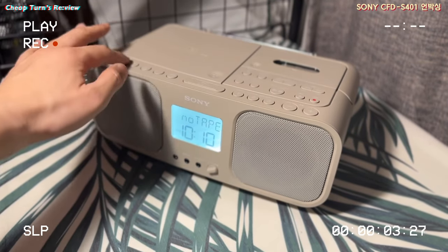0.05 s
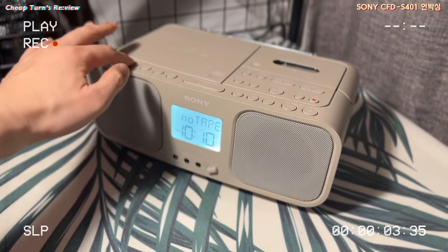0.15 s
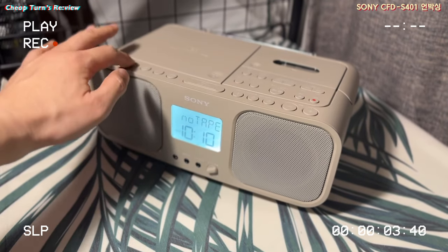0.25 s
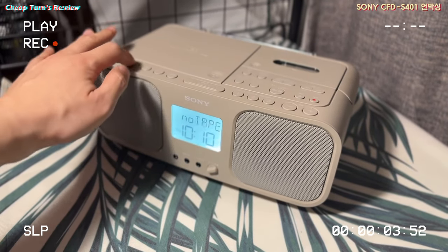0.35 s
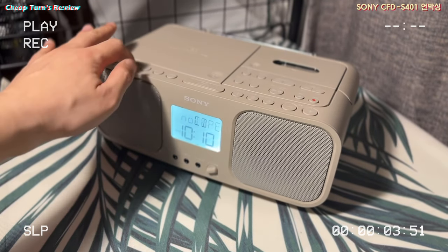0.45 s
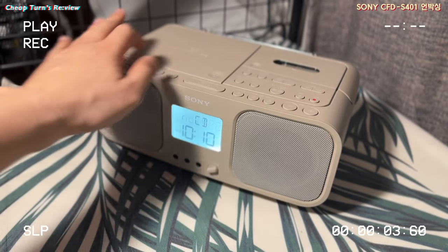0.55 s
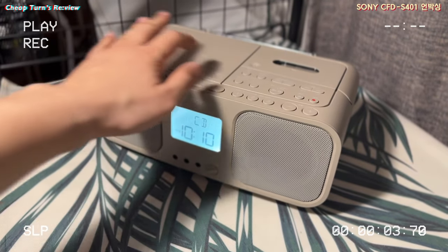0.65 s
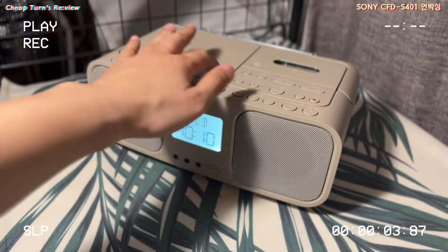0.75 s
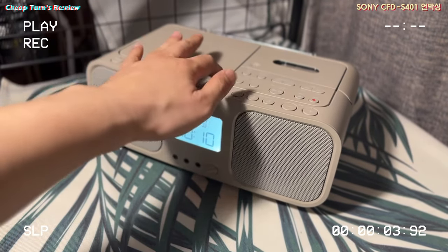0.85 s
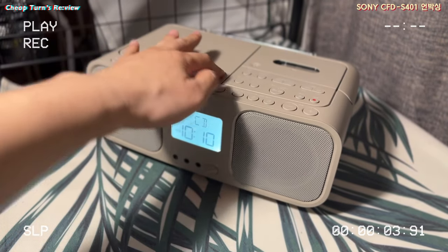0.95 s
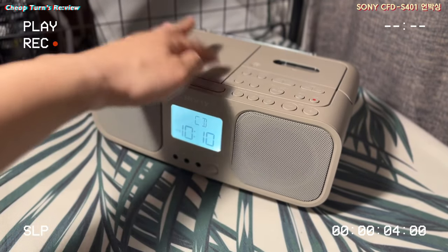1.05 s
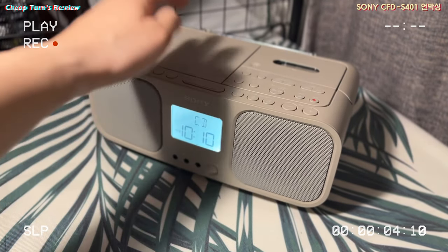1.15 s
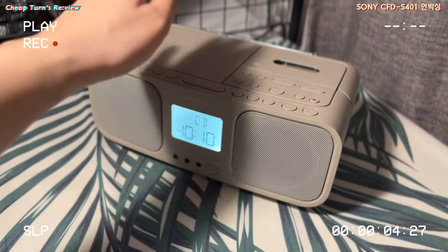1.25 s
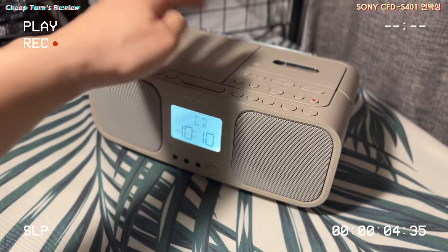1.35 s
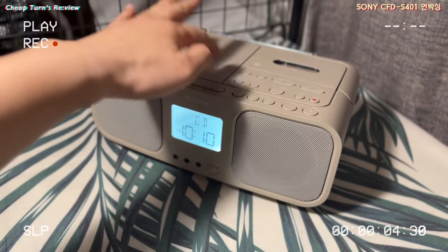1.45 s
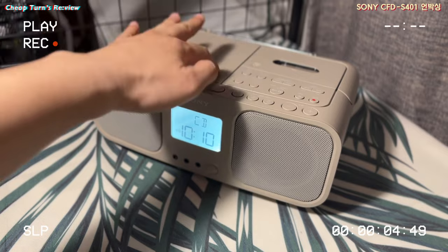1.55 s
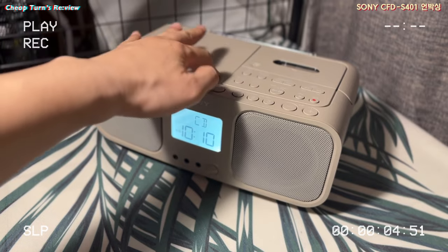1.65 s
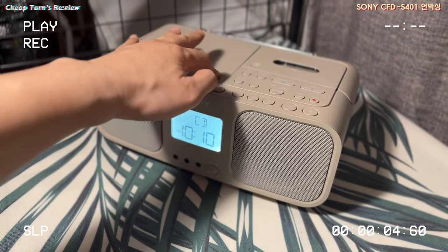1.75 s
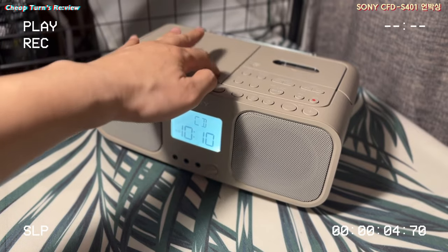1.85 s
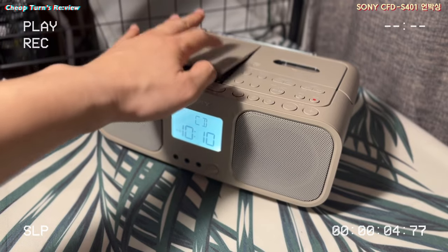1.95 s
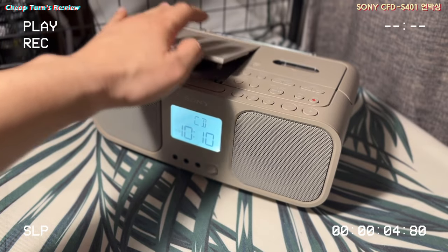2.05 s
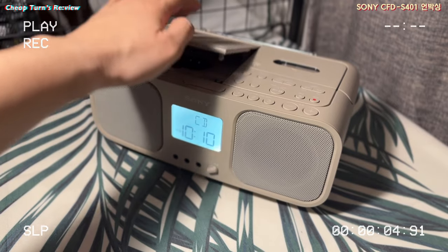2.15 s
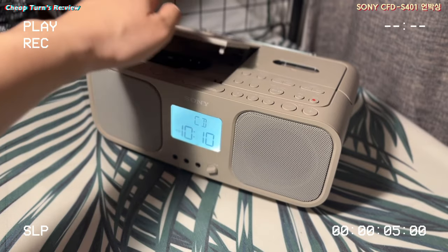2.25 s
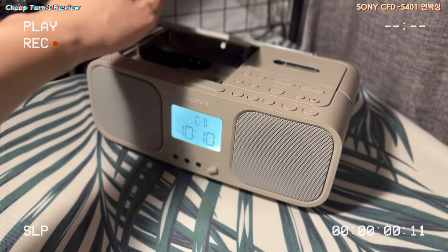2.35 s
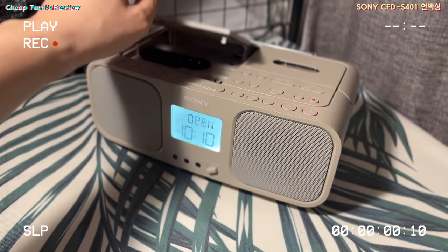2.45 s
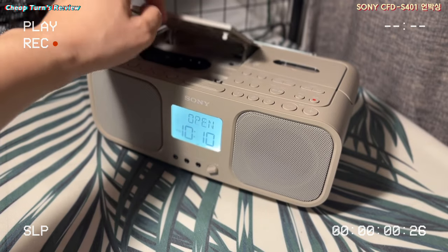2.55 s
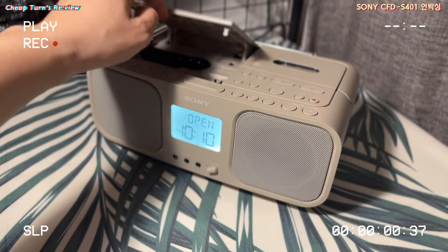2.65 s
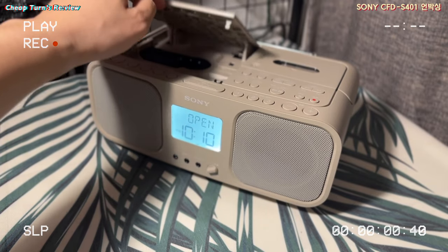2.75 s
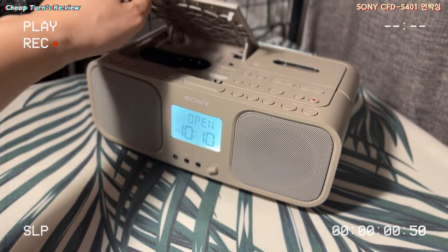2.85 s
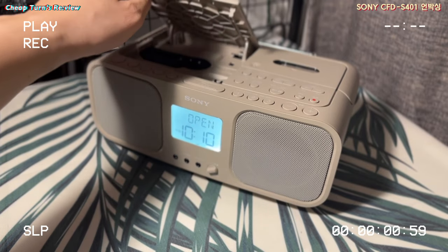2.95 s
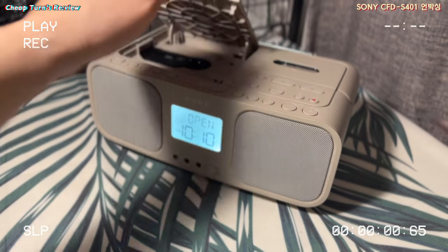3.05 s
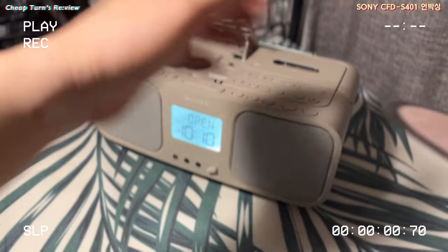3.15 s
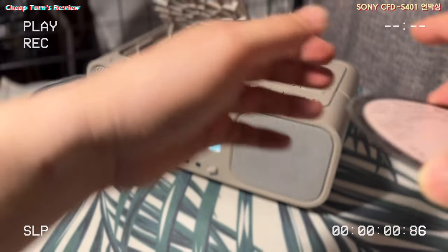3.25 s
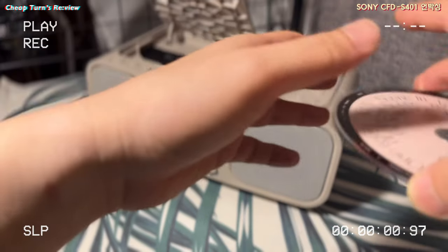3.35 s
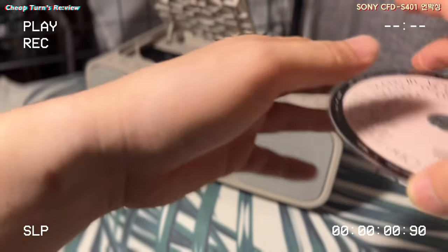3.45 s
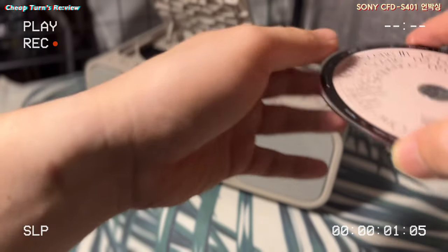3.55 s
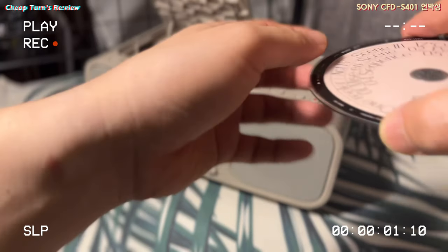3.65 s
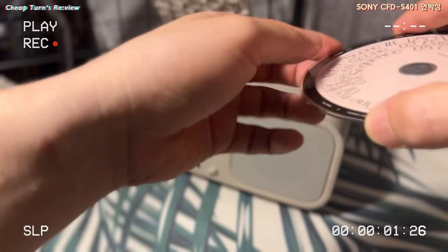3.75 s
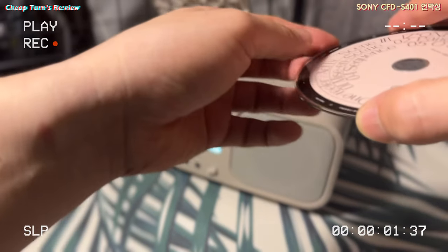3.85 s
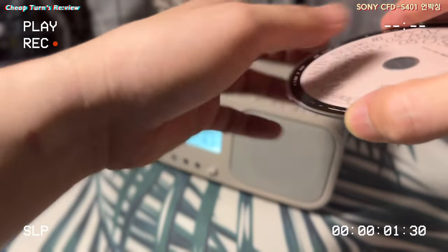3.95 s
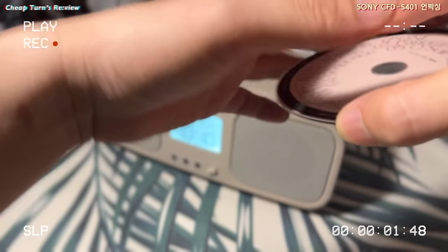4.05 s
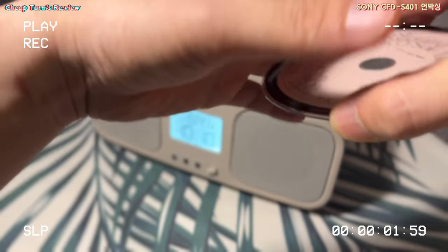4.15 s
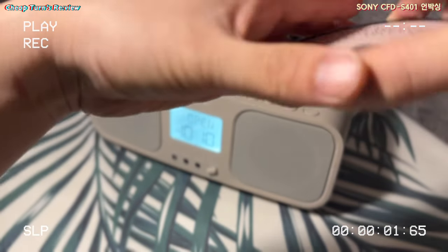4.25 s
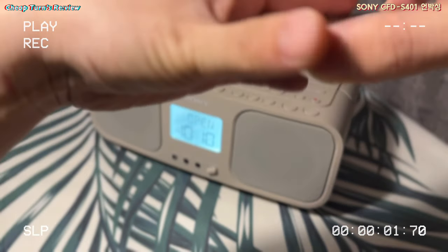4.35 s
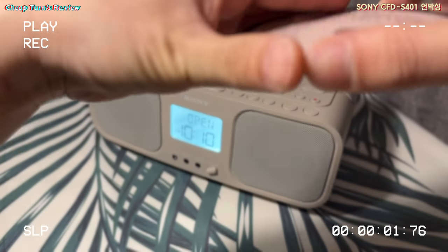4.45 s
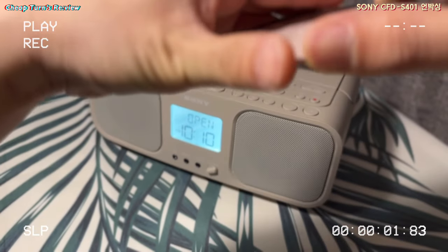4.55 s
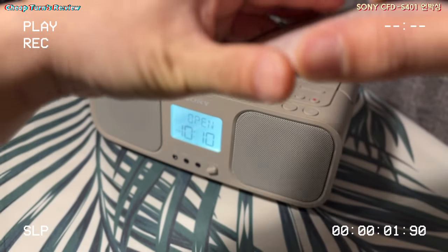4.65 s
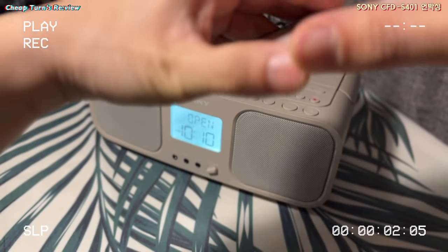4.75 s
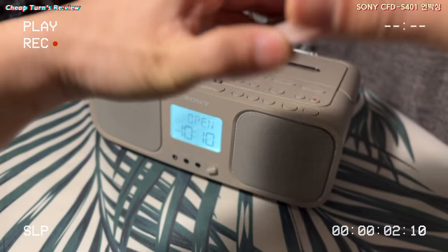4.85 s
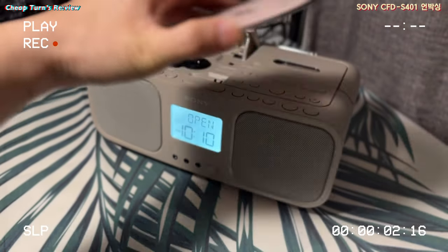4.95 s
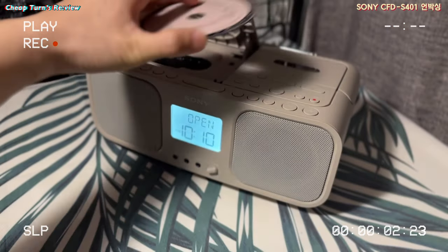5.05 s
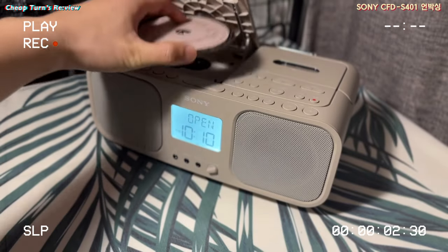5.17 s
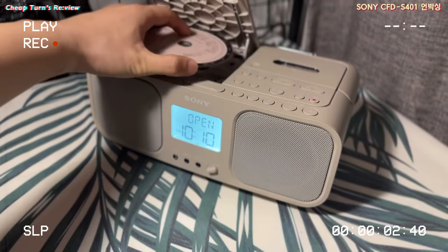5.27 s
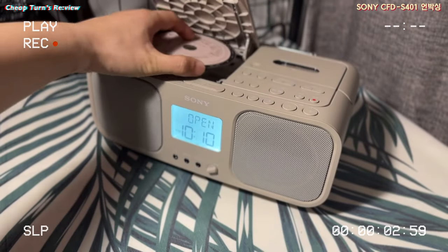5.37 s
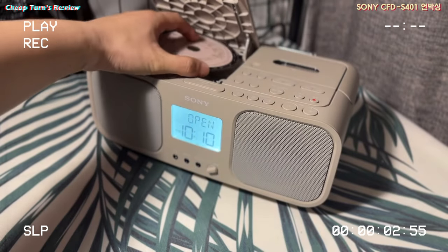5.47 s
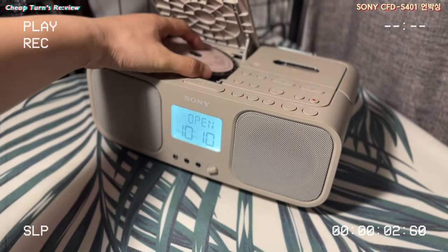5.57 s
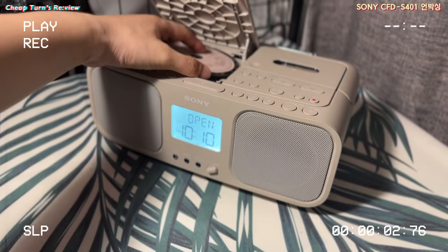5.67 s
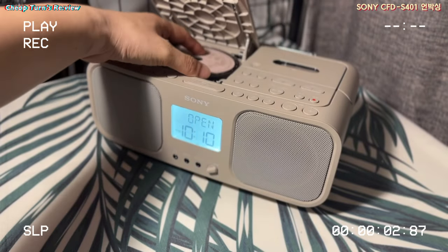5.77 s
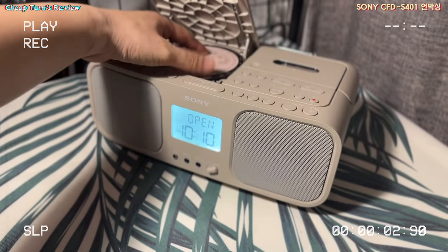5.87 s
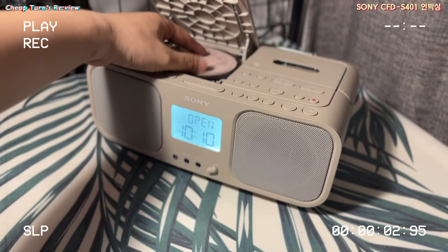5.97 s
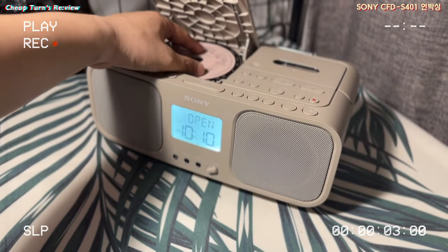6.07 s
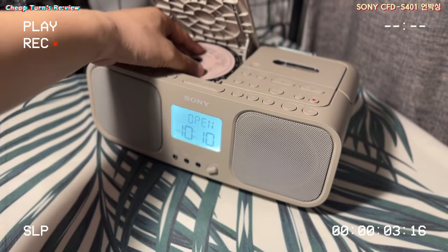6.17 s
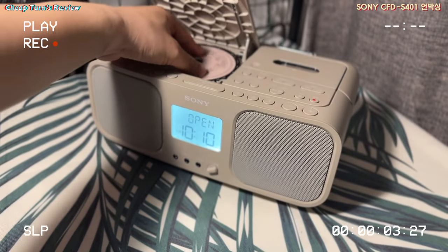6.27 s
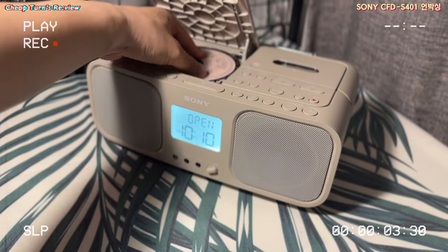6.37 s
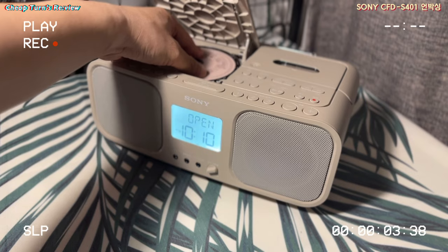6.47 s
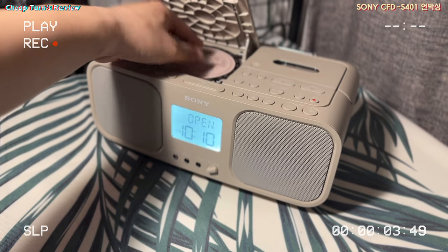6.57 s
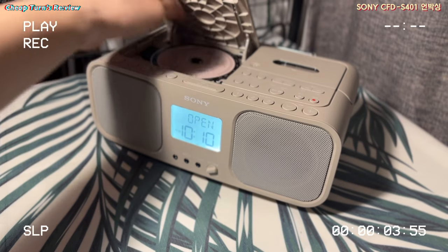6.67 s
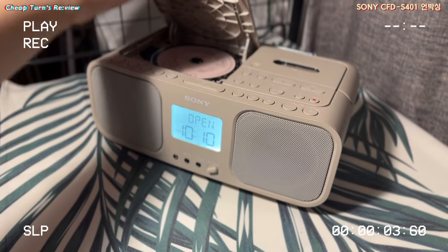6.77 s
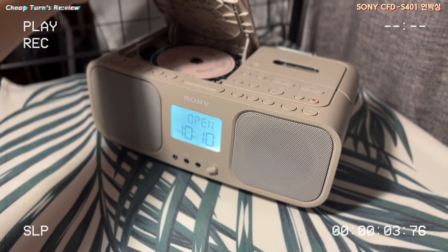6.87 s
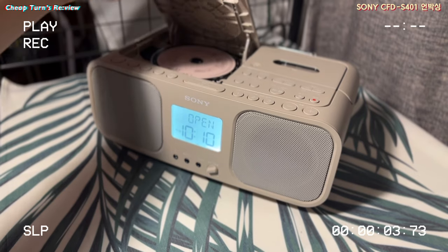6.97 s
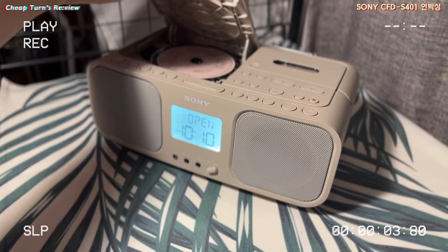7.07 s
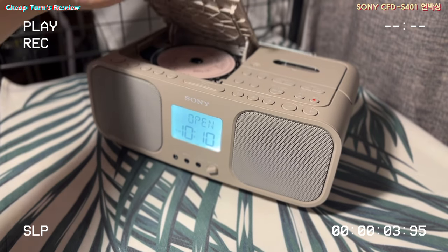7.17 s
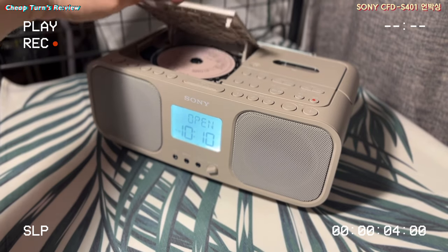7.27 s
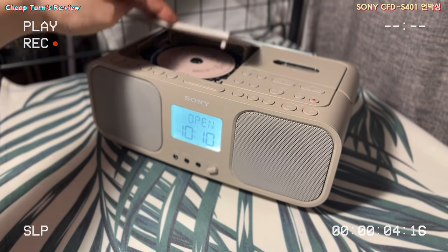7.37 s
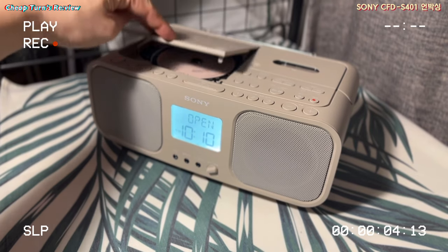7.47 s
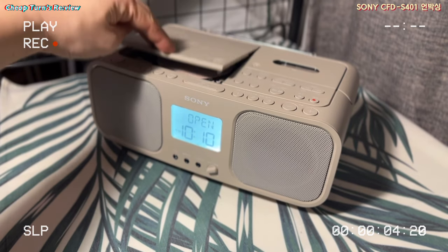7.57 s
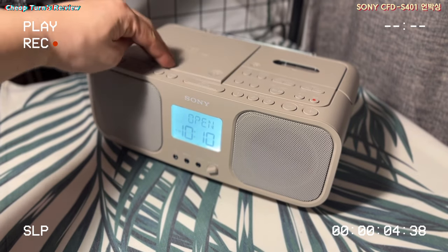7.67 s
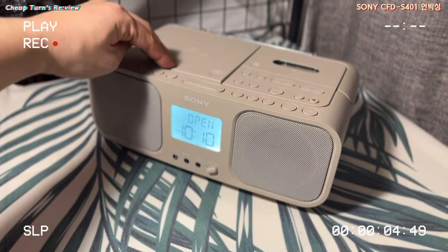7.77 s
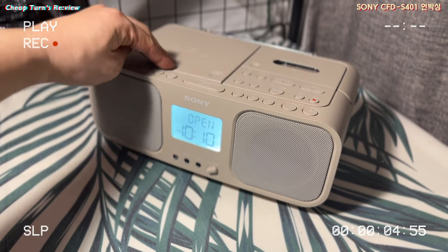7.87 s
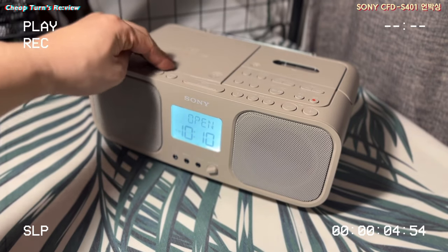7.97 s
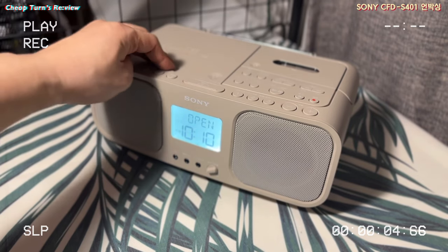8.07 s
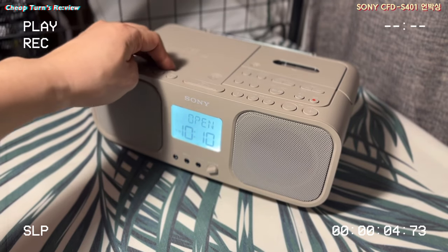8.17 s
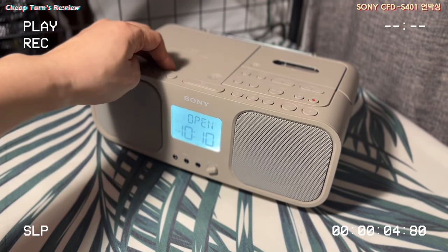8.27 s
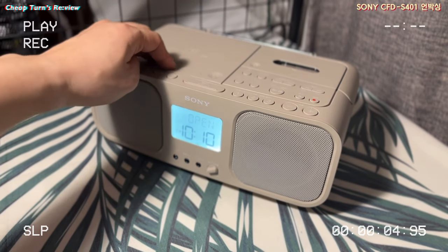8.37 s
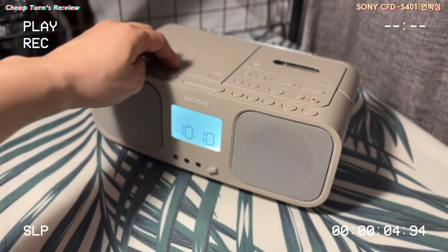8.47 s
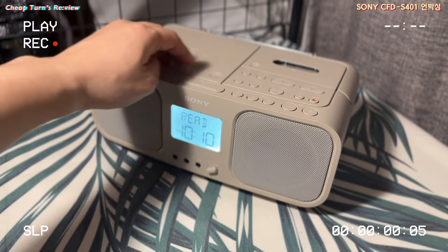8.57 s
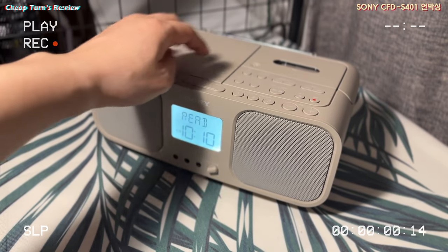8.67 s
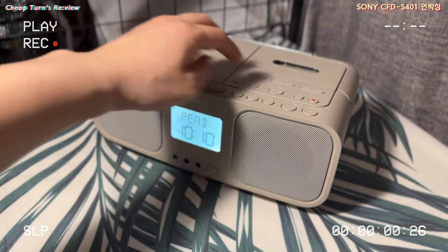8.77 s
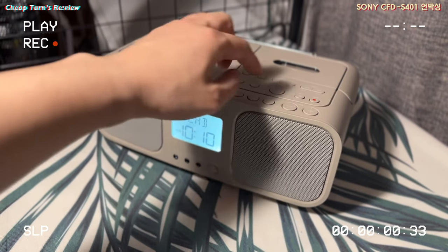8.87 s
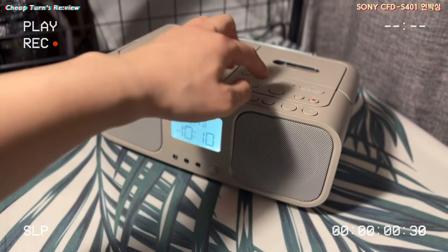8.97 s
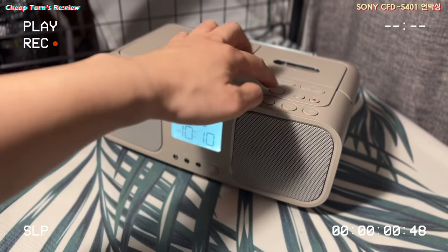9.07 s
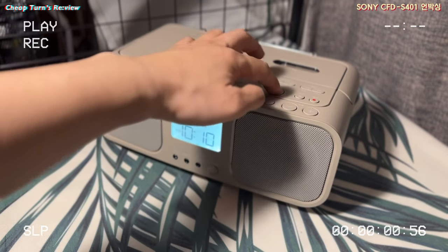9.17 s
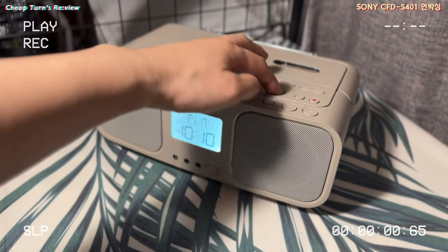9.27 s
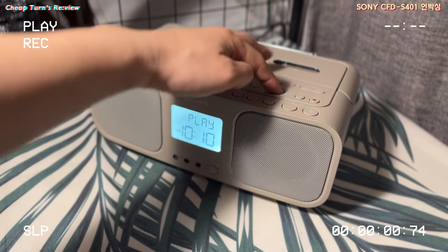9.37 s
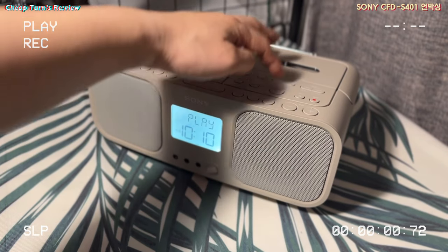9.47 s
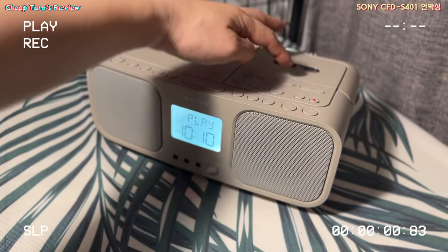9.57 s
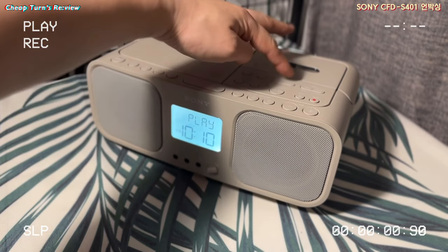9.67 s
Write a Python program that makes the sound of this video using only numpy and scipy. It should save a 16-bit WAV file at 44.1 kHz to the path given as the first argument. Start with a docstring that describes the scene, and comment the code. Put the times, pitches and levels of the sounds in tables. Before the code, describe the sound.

Close plastic clicks, a lid popping open, a disc rattling and snapping into place, lid clicks and a final firm button press over low rumble.

```python
"""A small, soft room, where a disc is loaded into a plastic portable stereo a little left of centre.
Buttons click, the lid unlatches and swings up, the disc scrapes into the tray and snaps onto its hub,
the lid is pressed shut and a last button is pushed. Blows excite decaying modes and noise, rubs are
random stick-slip, and a soft seat adds low thumps. Shaped noise gives an outside rumble and faint hiss,
a wavering sine a far engine drone; decaying noise gives the room's reflections."""
import sys
import numpy as np
from scipy import signal
from scipy.fft import rfft, irfft, next_fast_len
from scipy.io import wavfile

SR = 44100
rng = np.random.default_rng(int(sys.argv[2]) if len(sys.argv) > 2 else 0)


def pcm_store(signal):
    """Save signal as 16-bit PCM."""
    levels = np.round(np.clip(np.atleast_2d(signal), -1, 1) * 32767)
    wavfile.write(sys.argv[1], SR, levels.astype(np.int16).T)


N = 428635

# edges of the thud, knock, clack, click and snap registers: f/Hz
REGISTER_EDGES_HZ = [130, 400, 1100, 2800, 7000, 15000]
# modes of the disc, before each blow detunes and reweights them: f/Hz, relative level/dB, t60/s
DISC_RESONANCES = [(364.6, 9.5, 0.098), (445, 3.5, .08), (515, -2.5, .07), (610, -0.5, .065),
                   (1225, 2.5, 0.045), (1350, -5.5, 0.041), (1600, 0, .06), (1760, -2, .06), (2035, -8, .1),
                   (2530, -7.5, .06), (2999, -6, .05)]
# the hub's clips spring through the disc, then the disc lands on the platter; levels before trim:
# t/s, thud/dB, knock/dB, clack/dB, click/dB, snap/dB, base ring t60/s, contact rise/s
HUB_CONTACTS = [(6.3412, -38.5, -26.5, -33, -31.5, -31, 0.064, 0.00046),
                (6.3432, -29.5, -20.5, -35.5, -39, -47, 0.055, 0.00057)]


def from_db(db):
    """Amplitude gain from level: 20 dB is a factor of ten."""
    return 10 ** (np.asarray(db) / 20)


def rms_one(x):
    """Normalise the root-mean-square amplitude to one."""
    return x / np.sqrt(np.mean(x ** 2) + 1e-20)


def at_hz(points, hz):
    """Interpolate a spectrum on a logarithmic frequency axis."""
    f, value = np.transpose(points)
    return np.interp(np.log(np.maximum(hz, 1)), np.log(f), value)


def band(x, low_hz, high_hz, order=3):
    """Causal band-pass with maximally flat (Butterworth) response."""
    edges = [low_hz, min(high_hz, .45 * SR)]
    return signal.sosfilt(signal.butter(order, edges, "band", fs=SR, output="sos"), x)


def add(out, s, sound):
    """Linear superposition of a sound starting at time s."""
    i = round(s * SR)
    out[:, i:i + sound.shape[1]] += sound[:, :N - i]


def diffuse(size, spectrum=None):
    """Diffuse-field noise at unit rms: mid and side noises mix to a frequency-dependent correlation."""
    # left-right correlation of diffuse sound: f/Hz, correlation
    likeness = [(60, 1), (130, 0.84), (290, .78), (640, 0.18), (1400, -0.03), (3100, .2), (7000, 0.028),
                (15000, 1)]
    padded = next_fast_len(size, True)
    hz = np.fft.rfftfreq(padded, 1 / SR)
    mid, side = rfft(rng.standard_normal((2, padded)))
    alike = np.clip(at_hz(likeness, hz), -1, 1)
    pair = np.sqrt(1 + alike) * mid + np.sqrt(1 - alike) * side * [[1], [-1]]
    colour = 1 if spectrum is None else from_db(at_hz(spectrum, hz))
    return rms_one(irfft(pair * colour, padded)[:, :size])


def direct(x):
    """Time difference of arrival: a source left of centre reaches the right side later."""
    lag_s = 5.8e-5
    hz = np.fft.rfftfreq(len(x), 1 / SR)
    right = irfft(rfft(x) * np.exp(-2j * np.pi * hz * lag_s), len(x))
    return np.array([x, right])


def ringing(modes, t, scatter_db, spread, detune):
    """Modal synthesis: decaying sines, detuned and weighted anew each time, with a phase for each side."""
    hz, level_db, t60 = np.transpose(modes)[:, :, None]
    strength, skew, load = rng.standard_normal((3, len(modes), 1))
    fade = from_db(level_db + scatter_db * strength - 60 * t / t60)
    turn = spread * np.sign(skew) * np.minimum(hz / 700, 1)
    phase = 2 * np.pi * hz * (1 + detune * load) * t
    return np.array([(fade * np.sin(phase + way * turn)).sum(0) for way in (-1, 1)])


def local_modes(count, low_hz, high_hz, level_db, t60):
    """Local resonance: each spot on the shell also wakes a few small panel modes of its own."""
    place, size = rng.random((2, count))
    hz = low_hz * (high_hz / low_hz) ** place
    return np.transpose([hz, level_db + 8 * (size - .5), np.full(count, t60)])


def coloured(x, levels_db, trim_db, left_db):
    """Minimum-phase equalisation: the first 20 ms of a blow is steered to its level in each register."""
    size, edges, attack = x.shape[-1], np.array(REGISTER_EDGES_HZ), SR // 50
    hz, centres = np.fft.rfftfreq(size, 1 / SR), np.sqrt(edges[1:] * edges[:-1])
    power = (np.abs(rfft(x[:, :attack], size)) ** 2).mean(0) * 2 / (size * attack)
    starts, gain_db = np.searchsorted(hz, edges), np.zeros(len(centres))
    target_db = np.add(levels_db, trim_db)
    # repeated because the smooth curve lets neighbouring registers affect each other
    for _ in range(3):
        curve = from_db(at_hz(np.transpose([centres, gain_db]), hz))
        register_power = np.add.reduceat(power * curve ** 2, starts)[:-1]
        gain_db = gain_db + target_db - 10 * np.log10(register_power)
    sides_db = [at_hz(np.transpose([centres, gain_db + way * np.array(left_db)]), hz)
                for way in (.5, -.5)]
    # folding the cepstrum makes the filter minimum-phase, so nothing sounds early
    cepstrum = irfft(np.log(from_db(sides_db)), size)
    cepstrum[:, 1:size // 2] *= 2
    cepstrum[:, size // 2 + 1:] = 0
    return irfft(rfft(x) * np.exp(rfft(cepstrum)), size)


def contacts(rows, colour, ring_s, shortening):
    """Spectral slope of an impact: strength and touch set register levels; stronger blows ring shorter.

    Returns columns t/s, five register levels/dB, base ring t60/s, contact rise/s."""
    reference_db = -50  # level at which a blow rings for ring_s
    # the middle of the shell's range, and how far from it the whole hollowness is lost
    shell_centre_hz, shell_width_octaves = 1600, 2.75
    edges = np.array(REGISTER_EDGES_HZ)
    octaves = np.log2(np.sqrt(edges[1:] * edges[:-1]) / shell_centre_hz)
    s, level_db, brightness, hollow_db, rise = np.transpose(rows)[:, :, None]
    hollow_loss_db = hollow_db * (octaves / shell_width_octaves) ** 2
    levels_db = level_db + np.array(colour) + brightness * octaves - hollow_loss_db
    ring = ring_s * np.exp(-shortening * (level_db - reference_db))
    return np.hstack([s, levels_db, ring, rise])


def blows(table, modes, crack_db, crack_t60, modes_db, bass_ring, treble_ring,
          scatter_db, spread, detune, trim_db, left_db):
    """Impact excitation: a short crack, discrete modes and a wash of dense modes, coloured by contact."""
    out, t = np.zeros((2, N)), np.arange(next_fast_len(SR // 7, True)) / SR
    low, high = [signal.butter(2, 2500, kind, fs=SR) for kind in ("low", "high")]
    small_shell = signal.butter(2, 110, "high", fs=SR)
    dying = np.minimum((t[-1] - t) / .03, 1)
    for s, *levels_db, ring_t60, rise_s in table:
        crack = direct(rng.standard_normal(len(t)) * from_db(crack_db - 60 * t / crack_t60))
        tones = from_db(modes_db) * ringing(modes, t, scatter_db, spread, detune)
        panels = local_modes(count=12, low_hz=1437.6, high_hz=6690, level_db=-17.5, t60=0.44 * ring_t60)
        tones = tones + ringing(panels, t, scatter_db, spread, detune)
        # large, slow motions of the shell outlast the small fast ones
        slow_fade = from_db(-60 * t / (ring_t60 * bass_ring))
        slow = signal.lfilter(*low, diffuse(len(t))) * slow_fade
        fast_fade = from_db(-60 * t / (ring_t60 * treble_ring))
        fast = signal.lfilter(*high, rng.standard_normal((2, len(t)))) * fast_fade
        # a fingertip builds its force slowly and swallows the crack; plastic on plastic does not
        struck = (crack + tones + slow + fast) * (1 - np.exp(-t / rise_s)) * dying
        shell_sound = signal.lfilter(*small_shell, struck)
        add(out, s, coloured(shell_sound, levels_db, trim_db, left_db) * dying)
    return out


def background():
    """Stationary noise and narrow-band modulation: rumble booms in bass resonances, a drone wavers."""
    # slow swell of the outside rumble: t/s, relative level/dB
    rumble_swell = [(0.0, -64), (0.38, -65.5), (0.65, -63.5), (4.6, -63), (5.87, -56.5), (7.06, -60.5),
                    (8.58, -57.5), (8.93, -61), (9.72, -56)]
    # spectra of the rumble and the faint hiss: f/Hz, relative density/dB per Hz
    rumble_spectrum = [(20, -36.5), (35, -18.5), (48, -6.5), (58, 7), (68, -4), (82, -8), (96, -0.5),
                       (115, -15.5), (160, -10.5), (210, -18), (300, -22.5), (400, -30.5), (550, -29.5),
                       (1000, -61)]
    hiss_spectrum = [(200, -0.5), (600, 12), (1200, 7), (2500, 1), (5000, -2.5), (7000, -7.5), (9000, -14),
                     (12500, -9.5), (15000, -22.5)]
    # a far engine drone: t/s, f/Hz, relative level/dB
    drone_track = [(0, 150.6, -64), (2.2, 148.4, -88), (3.2, 119.1, -63.5), (4.251, 144.5, -60.5),
                   (5.7, 161.4, -64), (7.6, 146, -61), (9.72, 162.4, -59)]
    t = np.arange(N) / SR
    rumble_level_db = 4 + np.interp(t, *np.transpose(rumble_swell))
    rumble = diffuse(N, rumble_spectrum) * from_db(rumble_level_db)
    s, hz, level_db = np.transpose(drone_track)
    smooth = signal.butter(2, 8.7, fs=SR, output="sos")  # waver bandwidth in Hz
    # one second of lead-in lets the smoothing filter settle
    waver = rms_one(signal.sosfilt(smooth, rng.standard_normal((2, N + SR)))[:, SR:])
    phase = 2 * np.pi * np.cumsum(np.interp(t, s, hz)) / SR
    carrier = waver[0] * np.sin(phase) + waver[1] * np.cos(phase)
    drone = carrier * from_db(-1.0 + np.interp(t, s, level_db))
    return rumble + drone + from_db(-82.0) * diffuse(N, hiss_spectrum)


def case_contacts():
    """Spectral slope of the case's impacts: each part has its own colour and ring length."""
    # light ticks of a thin top panel; then buttons pressed and let go; the lid's latch springing
    # and catching; the lid knocking on its hinge and under the hand:
    # t/s, base level/dB, brightness/dB per octave, hollowness/dB, contact rise/s
    panel_ticks = [(0.027, -74.5, 0, 12, 0.0028), (0.099, -68.5, -1, 9, 0.012),
                   (0.514, -67.5, -2, 6, 0.0017), (2.678, -47, 0.3, 9, 0.0014), (2.89, -73, -2, 11, 0.023),
                   (8.178, -42.5, -0.37, 6, 0.0012), (8.245, -71, -2, 3.5, .005), (9.03, -78, -1, 5, .01)]
    buttons = [(0.268, -53, -4, 30, 0.00086), (0.48, -61.5, -2.1, 3, 0.0012), (0.853, -54.5, -5, 9, .004),
               (0.872, -61.5, -4, 0, 0.0014), (1.005, -78, -4.5, -6, 0.0032), (1.03, -61.5, -7, 5, 0.0014),
               (1.561, -55.5, -6, 10, 0.0034), (9.121, -59, -3.7, 13.5, 0.0013),
               (9.177, -40, -1.5, 19, 0.0008), (9.398, -40, -4, 14, 0.0053),
               (9.412, -50.5, -2.5, 17, 0.0026)]
    latch_clicks = [(1.661, -51, 1.4, -6.7, 0.0016), (1.88, -46.5, 1.13, -0.5, .002),
                    (7.446, -86.5, -0.5, -19, .0003), (7.6404, -53.5, 0.4, 1.5, 0.0017),
                    (8.02, -58, -1, 14, 0.00097), (8.114, -55.5, 2.5, -7, 0.00045),
                    (8.3366, -46.5, -1, -5.5, 0.0014), (8.419, -68.5, -4, -3, 0.0021),
                    (8.496, -77, -5.5, -6.5, 0.001)]
    lid_knocks = [(2.68, -59.5, -5, 7.5, 0.0065), (2.904, -80.5, -3, -1, 0.0039),
                  (6.709, -60, -3, 6.5, 0.00088), (6.745, -45, -3.5, 13, 0.0064),
                  (6.773, -44, -4, 11.5, 0.002), (6.951, -63, -6, 15.5, 0.00075),
                  (7.025, -68.5, -9, 10.5, 0.0023), (7.262, -80.5, -9, 7.5, 0.006),
                  (7.849, -64.5, -6, 10, .0015)]
    # each part's own colour; the thin panel rings mostly in the clack register:
    # thud/dB, knock/dB, clack/dB, click/dB, snap/dB
    panel_colour = (-13, -15.5, -3, -10, -9.5)
    button_colour = (-0.34, -0.38, 0.12, -0.56, -1.8)
    latch_colour = (-0.49, -0.94, -2.7, 1.23, 1.3)
    lid_colour = (0.046, -0.35, -0.45, 0.34, -0.96)
    return np.vstack([contacts(buttons, button_colour, ring_s=0.077, shortening=0.025),
                      contacts(latch_clicks, latch_colour, ring_s=0.094, shortening=.003),
                      contacts(panel_ticks, panel_colour, ring_s=0.059, shortening=0.014),
                      contacts(lid_knocks, lid_colour, ring_s=0.087, shortening=0.022)])


def case_blows(case_taps):
    """Impact excitation of the plastic case, whose treble wash dies much sooner than its bass."""
    # modes of the case, before each blow detunes and reweights them: f/Hz, relative level/dB, t60/s
    case_resonances = [(166.3, 0, 0.27), (236.8, -9, 0.51), (463.7, -3, 0.19), (568.6, -6.5, 0.22),
                       (902, 6.5, 0.063), (1028, 4.5, 0.08), (1174, 3.5, 0.0547), (1872, 8, 0.052),
                       (2390, 3.5, 0.06), (2893, 4.5, .045), (3400, 6.5, 0.051), (4083, 3, 0.058)]
    return blows(case_taps, case_resonances, crack_db=13.5, crack_t60=0.004, modes_db=-19.5,
                 bass_ring=1.42, treble_ring=0.2, scatter_db=1.5, spread=0.15, detune=0.0347,
                 trim_db=[-2.3, 0.062, 0.58, 0.51, 0.49], left_db=[-1.05, .3, .4, 0.99, 0.25])


def cushion(table, hz, t60, level_db, limit_db):
    """Damped mass-spring motion: blows rock the case on its soft seat, which gives only so far."""
    out, t = np.zeros((2, N)), np.arange(SR // 2) / SR
    fade = from_db(level_db - 60 * t / t60)
    swing = np.sin(2 * np.pi * hz * t) * fade * (1 - np.exp(-t / 0.02))
    for s, thud_db, *rest in table:
        add(out, s, from_db(min(thud_db, limit_db)) * np.array([swing, swing]))
    return out


def room(x, wet_db, early_db, early_t60, treble_db):
    """Reverberation by convolution: quick wall reflections and a faint tail, t60 set by frequency."""
    # late decay of the room: f/Hz, t60/s
    decay_times = [(100, 0.4), (500, 0.43), (2000, 0.32), (5000, 0.17), (12000, 0.22)]
    t = np.arange(next_fast_len(SR // 3, True)) / SR
    hz, noise, tail = np.fft.rfftfreq(len(t), 1 / SR), rfft(diffuse(len(t))), 0
    noise = noise * from_db(at_hz([(2000, 0.0028), (12000, treble_db)], hz))
    early = from_db(early_db - 60 * t / early_t60)
    centres, t60s = np.transpose(decay_times)
    # overlapping frequency shares of one noise, each with its own late decay
    for share, t60 in zip(np.eye(len(centres)), t60s):
        part = irfft(noise * at_hz(np.transpose([centres, share]), hz), len(t))
        tail = tail + part * (from_db(wet_db - 60 * t / t60) + early)
    tail = tail * (1 - np.exp(-t / 0.0035)) / np.sqrt(0.016 * SR)
    return signal.oaconvolve(x, tail, axes=1)[:, :N]


def stroke(t, length_s):
    """Envelope of a rub, in dB: it swells to its firmest at t = 0 and eases off."""
    swell, depth_db = .45, 23.5  # share of a stroke spent swelling; its ends lie this far below its peak
    return -depth_db * np.maximum(-t / swell, t / (1 - swell)) / length_s


def sliding(slips_per_s, size_db, smooth_db, modes_db, body_db, treble_db):
    """Stick-slip friction: tiny slips ring the plastic; fine hiss comes straight from the surfaces."""
    # sliding plastic and fingertips: t/s at the firmest, length/s, base level/dB, base treble/dB
    slides = [(0.697, 0.2, -73, -104), (1.486, 0.11, -73.5, -90), (1.649, 0.068, -54.5, -74),
              (1.869, 0.048, -43, -60), (1.901, 0.067, -55, -74), (1.979, 0.15, -68.5, -75),
              (2.717, 0.9, -77, -83), (2.907, 0.056, -64, -67), (4.14, 0.097, -70.5, -65.5),
              (4.678, .09, -73.5, -73), (4.883, 0.15, -76, -78), (5.215, 0.28, -89, -81),
              (5.39, 0.17, -69, -69.5), (5.49, 0.24, -56.5, -68), (5.66, 0.27, -59.5, -75),
              (5.72, 0.054, -55, -66), (5.857, 0.079, -41, -63), (5.894, 0.12, -44.5, -77),
              (5.925, 0.085, -47, -71), (5.989, 0.042, -43, -68), (6.496, .1, -60.5, -85.5),
              (6.743, 0.089, -53, -54), (6.774, 0.029, -41, -50), (6.97, 0.28, -74, -100),
              (7.287, .09, -78, -71), (7.633, 0.033, -62.5, -72.5), (8.336, 0.089, -58, -89)]
    out, t, size = np.zeros((2, N)), np.arange(SR // 12) / SR, SR // 2
    now = (np.arange(size) - size // 2) / SR
    for s, length_s, level_db, hiss_db in slides:
        slip_db = size_db * np.minimum(rng.exponential(1, size), 4)
        sizes = from_db(slip_db) * rng.choice([-1, 1], size)
        slips = rms_one(sizes * (rng.random(size) < slips_per_s / SR))
        friction = direct(slips) + from_db(smooth_db) * diffuse(size)
        tones = ringing(DISC_RESONANCES, t, scatter_db=7.0, spread=.5, detune=0.047)
        shell = diffuse(len(t)) * from_db(-60 * t / 0.11) + from_db(modes_db) * tones
        rung = signal.fftconvolve(friction, shell, axes=1)[:, :size]
        body = rms_one(band(rung, 300, 4000, order=2))
        hiss = rms_one(band(friction, 9000, 13800, order=2))
        rub = body * from_db(body_db + level_db) + hiss * from_db(treble_db + hiss_db)
        add(out, s + now[0], rub * from_db(stroke(now, length_s)))
    return out


def disc_blows():
    """Impact excitation of the disc's modes as it knocks about in the tray."""
    # the disc's knocks: t/s, base level/dB, brightness/dB per octave, hollowness/dB, contact rise/s
    disc_knocks = [(5.449, -52, -4, 22, 0.0045), (5.562, -62, -0.5, 10.5, 0.00034),
                   (5.627, -56, 3.5, 41, 0.00082), (5.684, -42, -0.5, 5.5, .0004),
                   (5.703, -41.5, -0.46, -3.5, 0.00054), (5.715, -50, -4.5, 1.5, 0.0019),
                   (5.78, -48.5, -2, 18, 0.0033), (5.79, -49, -0.5, 10, 0.0016),
                   (5.824, -57.5, -3.5, 2, 0.0012), (5.855, -49, -0.7, -3, 0.0045),
                   (5.881, -46.5, -0.2, 2, 0.0012), (5.985, -45.5, -2.5, -3.5, 0.00098),
                   (6.055, -58.5, -2.5, 9, 0.0013), (6.235, -68, -3.5, -2.5, 0.00025),
                   (6.304, -68.5, -2, 6, .0003), (6.482, -65, -5, 26, 0.0064)]
    # the disc's own colour: thud/dB, knock/dB, clack/dB, click/dB, snap/dB
    disc_colour = (-0.45, 0.13, 0, 0, -1.5)
    disc_taps = contacts(disc_knocks, disc_colour, ring_s=0.056, shortening=.003)
    return blows(disc_taps, DISC_RESONANCES, crack_db=5, crack_t60=0.019, modes_db=-12.0,
                 bass_ring=1.4, treble_ring=0.97, scatter_db=5.0, spread=0.57, detune=0.015,
                 trim_db=[0.31, 0.38, 0.55, -0.58, -.3], left_db=[-0.47, -.3, .4, .6, -.6])


def hub_blows():
    """Elastic release and impact: the clips spring through the disc, which lands on the platter."""
    # modes of the hub, before each blow detunes and reweights them: f/Hz, relative level/dB, t60/s
    hub_resonances = [(300, -3, .11), (365.4, -1.5, 0.066), (454, 4, 0.09), (525, -2, .09),
                      (575, 11.5, .03), (636, 6, .065), (715, -4.5, .065), (886, -5.5, 0.048),
                      (1255, -3, .05), (1286, 4.5, .052), (1730, 2, 0.11), (2170, -5.5, 0.16),
                      (2223, -3, .08), (2640, -7, 0.059), (2963, -5, .08), (3860, -5, 0.047)]
    return blows(HUB_CONTACTS, hub_resonances, crack_db=12, crack_t60=0.0028, modes_db=-13.5,
                 bass_ring=1.6, treble_ring=0.86, scatter_db=0.5, spread=0.28, detune=0.002,
                 trim_db=[1.2, 1.5, 6.4, 1.6, 3.2], left_db=[-1.8, 1.0, -1.0, 6.0, 2.8])


def scene():
    """Superposition of direct sound, its room reflections and the background."""
    outside = background()
    case_taps = case_contacts()
    case = case_blows(case_taps)
    thumps = cushion(case_taps, hz=96.7, t60=0.3, level_db=5.5, limit_db=-50)
    thumps = thumps + cushion(HUB_CONTACTS, hz=85, t60=0.88, level_db=-12.5, limit_db=-30)
    rubs = sliding(slips_per_s=450, size_db=6.5, smooth_db=-5.5, modes_db=-15, body_db=-0.5, treble_db=-0.5)
    near = case + disc_blows() + hub_blows() + rubs + thumps
    reflected = room(near, wet_db=-17.5, early_db=-4.0, early_t60=0.1, treble_db=-7)
    return near + reflected + outside


def record(dry):
    """Linear filters shape the treble: a dip near 8.3 kHz, a roll-off and a steep cut."""
    dipped = dry - 0.88 * signal.lfilter(*signal.iirpeak(8300, 5, fs=SR), dry)
    dull = signal.sosfilt(signal.butter(10, 14100, fs=SR, output="sos"), dipped)
    return signal.sosfilt(signal.ellip(10, .1, 80, 15800, fs=SR, output="sos"), dull)


dry = scene()
out = record(dry)
pcm_store(out)
```